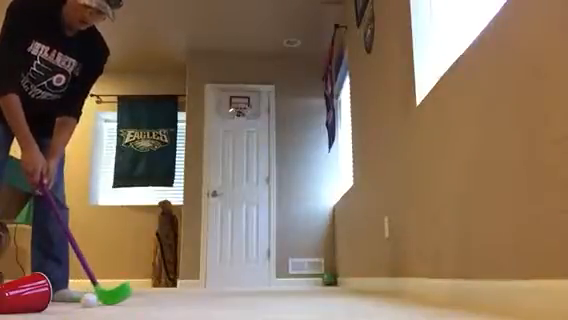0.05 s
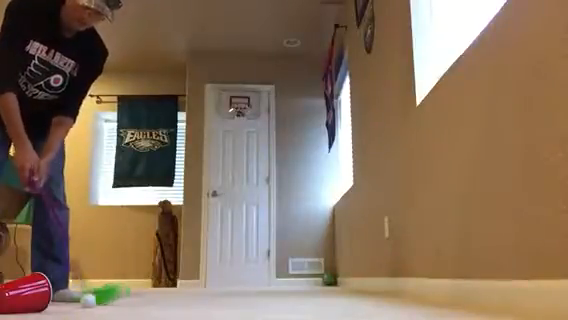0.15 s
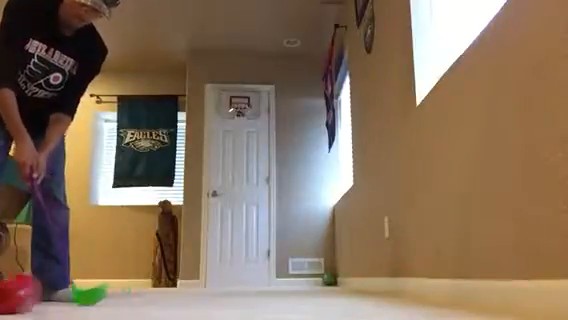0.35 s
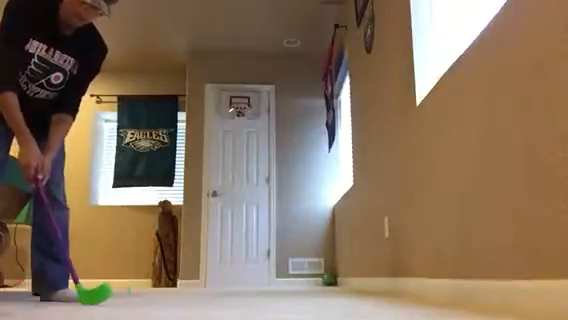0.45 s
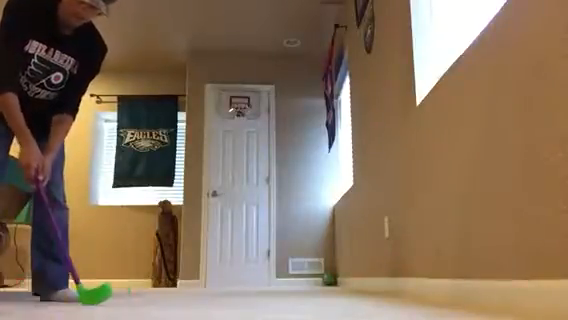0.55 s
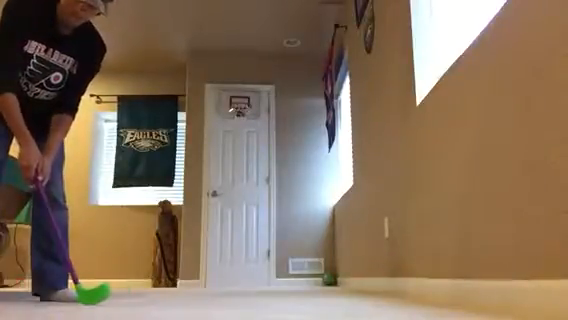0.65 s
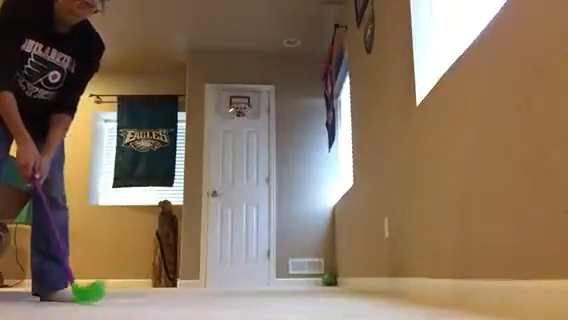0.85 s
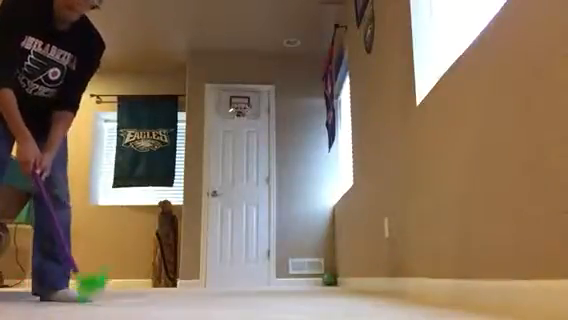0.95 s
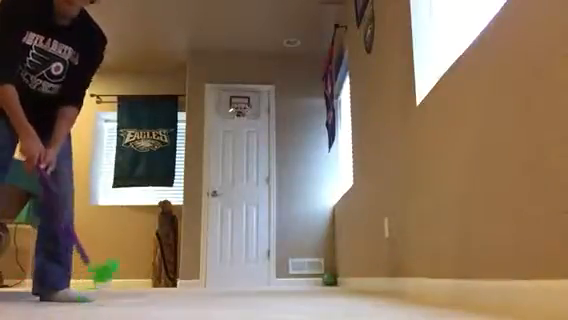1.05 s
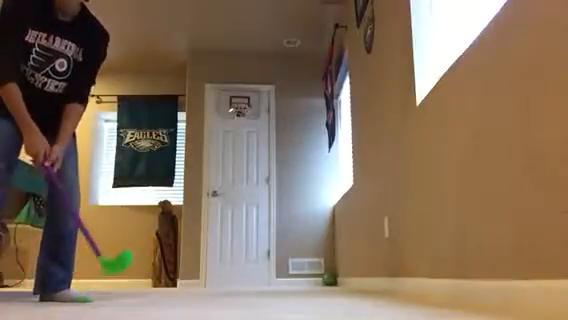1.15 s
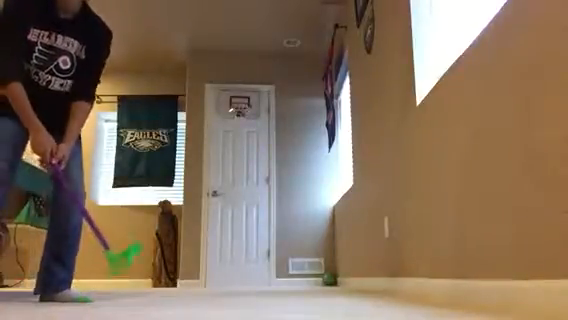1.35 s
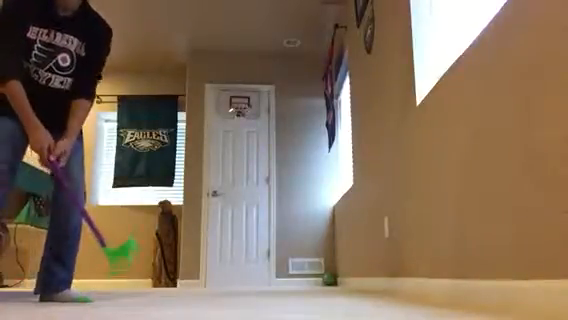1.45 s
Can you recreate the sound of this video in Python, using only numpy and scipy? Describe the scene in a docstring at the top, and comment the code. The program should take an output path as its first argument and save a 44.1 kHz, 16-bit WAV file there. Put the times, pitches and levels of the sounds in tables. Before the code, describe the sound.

A hollow plastic ball clatters in a plastic cup. A toy club taps it first, then it knocks three quick times in the cup, rolls and rattles faintly to rest. Heard nearby in a small carpeted room.

```python
"""Toy putt into a plastic cup.

A toy club taps a hollow plastic ball across a carpet into a plastic cup lying on its side.
The ball knocks three times, ringing the cup's body, wall and air, then rolls and rattles to rest.
The floor thumps softly, the lifted club clicks, and a small room answers over a low house hum."""
import sys
import numpy as np
from scipy import signal
from scipy.fft import rfft, irfft, next_fast_len
from scipy.io import wavfile

SR = 44100
rng = np.random.default_rng(int(sys.argv[2]) if len(sys.argv) > 2 else 0)


def generate_wav(sig):
    """Save sig (samples, or channels by samples) to the path in sys.argv[1] as 16-bit PCM at SR."""
    pcm = np.round(np.clip(np.atleast_2d(sig).T, -1, 1) * 32767).astype(np.int16)
    wavfile.write(sys.argv[1], SR, pcm)


N = 66150

# ball-cup contacts [t/s, air level/dB, body level/dB, wall level/dB, click level/dB]
CONTACTS = [(.3360, -15, -9.5, -18.5, -25), (.3440, -54, -20.5, -18, -27), (.3475, -59, -26.5, -8, -45),
            (.3610, -35, -46, -24, -65), (.4213, -19.5, -11.5, -29.5, -24.5),
            (.4325, -23.5, -25.5, -22.5, -58), (.4870, -19.5, -13.5, -56, -30),
            (.4980, -30, -51, -24, -66.5), (.7100, -68, -69, -64, -50), (0.748, -50, -74, -79, -49),
            (0.8021, -66, -34.5, -47.5, -50.5), (.8650, -52, -37, -41.5, -48), (0.8903, -53, -46, -39, -61),
            (0.92, -68, -37.5, -37, -54), (0.9294, -47.5, -29.5, -35, -43), (.9415, -36.5, -41.5, -32, -82)]
# cup modes: whole body, then thin wall [f/Hz, level/dB, t60/s]
CUP_MODES = [(548.4, -5.5, 0.065), (716.7, 3, 0.035), (896, -21, 0.14), (1016, -7, 0.048),
             (1193.4, -0.5, .065), (1257.8, -1, .065), (1449, -21, .08), (1568, -16, .11),
             (1951, -24, 0.068), (2043, -25.5, 0.1103), (2099, -19, .11), (2420, -24, 0.036),
             (2814, -28.5, 0.13), (3322, -25.5, 0.14), (4130, -30.5, 0.1213)]
# air mode of the cup [f/Hz, level/dB, t60/s]
CUP_AIR_MODE = [(533, 0, .195)]
# contact click spectrum [f/Hz, level/dB]
CLICK_SPECTRUM = [(500, 11), (2000, 3), (4000, -3), (4800, -3.5), (6000, 6), (7700, -5), (8900, 2),
                  (10300, -20), (12000, -4.5), (15500, -14)]
# plastic shell spectrum [f/Hz, level/dB]
SHELL_SPECTRUM = [(400, -6), (1000, 1.5), (1500, 11.5), (1700, 4.5), (2150, 11.5), (2530, -5), (2900, 3),
                  (3300, -1.5), (3600, -4.5), (4050, 0.5), (4700, -11.5), (5600, 0), (6700, -5.5),
                  (7700, -13.5), (8900, -17), (10300, -29.5), (12000, -13.5), (15500, -36.5)]
# carpeted floor thud spectrum [f/Hz, level/dB]
THUD_SPECTRUM = [(30, -34.5), (70, -11.5), (120, -3), (250, -1.5), (450, -4), (700, -14.5), (1500, -16),
                 (5000, -63.5)]
# envelope of the rolling ball [t/s, level/dB]
ROLL_ENVELOPE = [(.55, -45.5), (.62, -57), (.69, -59), (.74, -60), (0.809, -48.5), (.85, -52), (.93, -51),
                 (0.964, -48.5), (0.986, -83), (1.1, -100)]
# floor rumble under the ball [f/Hz, level/dB]
RUMBLE_SPECTRUM = [(60, -8), (130, -1.5), (230, -7.5), (340, 1.5), (470, 1.5), (600, -5), (1000, -10),
                   (1500, -39), (5000, -57)]
# modes of club head and ball [f/Hz, level/dB, t60/s]
PUTT_MODES = [(248, -24, 0.018), (389, 6.5, 0.016), (607, -5.5, 0.12), (903, -7.5, 0.043),
              (1472, -28.5, 0.21), (2285, -31, 0.17)]
# club face spectrum [f/Hz, level/dB]
FACE_SPECTRUM = [(600, -6), (1500, 0.5), (2100, -1), (2800, -4.5), (4000, 2.5), (4700, -2), (5500, 1.5),
                 (7500, 2), (8300, -6.5), (10300, -4.5), (13000, -7.5), (15500, -14)]
# hollow shaft spectrum [f/Hz, level/dB]
SHAFT_SPECTRUM = [(120, -38.5), (300, 12.5), (420, 0), (560, 4.5), (900, -2.5), (1700, -4), (2500, 8.5),
                  (4000, -4), (5200, 1.5), (8000, -6.5), (10300, -11.5), (12000, -12.5), (15500, -32.5)]
# clicks of the lifted club [t/s, level/dB]
LIFT_CLICKS = [(1.358, -50), (1.376, -55)]
# floor thumps [t/s, level/dB, rise/s]
THUMPS = [(0.175, -47.5, 0.02), (0.45, -44.5, 0.033), (0.67, -47.5, 0.047), (.79, -47, 0.017),
          (0.968, -61.5, 0.11), (1.21, -55.5, 0.033), (1.376, -56.5, 0.024)]
# near wall echoes [delay/s, level/dB]
WALL_ECHOES = [(0.0092, -17), (0.0259, -15)]
# room decay [f/Hz, t60/s]
ROOM_DECAY = [(100, .5), (500, .38), (1500, .4), (3000, .4), (6000, .42), (9000, .34), (15000, .27)]
# response of the carpeted room [f/Hz, level/dB]
ROOM_COLOUR = [(100, -2.5), (300, 0), (1000, 1), (3000, 4), (6000, 0), (9000, -3.5), (15000, -4.5)]
# house hum spectrum [f/Hz, level/dB]
HUM_SPECTRUM = [(20, -38), (45, -7.5), (75, 2.5), (110, -7.5), (220, -12), (350, -14.5), (550, -21.5),
                (1800, -23), (6000, -25), (16000, -40)]

BODY_ATTACK_S, WALL_ATTACK_S, MODE_SCATTER_DB = .003, .002, 2.5


def cup_knocks(wall_from_hz=950, shell_db=-4, thud_db=-25.5):
    """Each contact clicks, rings the cup and its air, and presses it on the floor: (ring, noise)."""
    body_modes = [mode for mode in CUP_MODES if mode[0] < wall_from_hz]
    wall_modes = [mode for mode in CUP_MODES if mode[0] >= wall_from_hz]
    out = np.zeros((2, N))
    for at_s, air_db, body_db, wall_db, click_db in CONTACTS:
        air = amp(air_db) * ring(CUP_AIR_MODE, BODY_ATTACK_S)
        body = amp(body_db) * ring(body_modes, BODY_ATTACK_S)
        wall = amp(wall_db) * ring(wall_modes, WALL_ATTACK_S)
        click = burst(CLICK_SPECTRUM, t60_s=.011) + amp(shell_db) * burst(SHELL_SPECTRUM, t60_s=.075)
        thud = amp(body_db + thud_db) * burst(THUD_SPECTRUM, t60_s=.14)
        out[0] += delayed(air + body + wall, at_s)
        out[1] += delayed(amp(click_db) * click + thud, at_s)
    return out


def ball_roll(ticks_per_s=300, max_t60_s=.06, grit_db=-8):
    """The ball's uneven skin ticks along the cup wall and rumbles the floor: (ring + rumble, grit)."""
    ticks = (rng.random(N) < ticks_per_s / SR) * np.tanh(rng.standard_normal(N))
    envelope = amp(np.interp(clock(), *np.transpose(ROLL_ENVELOPE), left=-120, right=-120))
    damped_modes = [(hz, db, min(t60_s, max_t60_s)) for hz, db, t60_s in CUP_MODES[1:]]
    cup = unit(signal.fftconvolve(ticks, ring(damped_modes, WALL_ATTACK_S))[:N])
    grit = unit(signal.fftconvolve(ticks, burst(SHELL_SPECTRUM, t60_s=.013))[:N])
    return np.array([envelope * cup + floor_rumble(), envelope * amp(grit_db) * grit])


def floor_rumble(from_s=.597, to_s=1, fade_s=.093, level_db=-56):
    """The floor carries the rolling ball as low noise."""
    t = clock()
    envelope = np.clip(np.minimum(t - from_s, to_s - t) / fade_s, 0, 1)
    return amp(level_db) * envelope * noise(RUMBLE_SPECTRUM)


def putt(at_s=.2352, level_db=-11, echo_s=.0103, brush_db=-34, brush_rise_s=.0041):
    """The club brushes the carpet and pops the ball; the click echoes off a wall: (ring, noise)."""
    face = burst(FACE_SPECTRUM, t60_s=.005)
    shell = amp(-19) * burst(FACE_SPECTRUM, t60_s=.06)
    click = amp(-12) * (face + shell)
    echo = amp(-6) * delayed(click, echo_s)
    thud = amp(-13) * burst(THUD_SPECTRUM, t60_s=.16)
    hit = amp(level_db) * (click + echo + thud)
    brush = amp(brush_db) * noise(THUD_SPECTRUM) * np.exp(-abs(clock() - at_s) / brush_rise_s)
    pop = amp(level_db) * ring(PUTT_MODES, attack_s=.0015)
    return np.array([delayed(pop, at_s), delayed(hit, at_s) + brush])


def club_lift(scuff_s=1.34, scuff_db=-64, half_width_s=.025):
    """The hollow club scuffs and clicks softly as it comes off the carpet."""
    out = amp(scuff_db) * noise(SHAFT_SPECTRUM) * np.exp(-((clock() - scuff_s) / half_width_s) ** 2)
    for at_s, db in LIFT_CLICKS:
        click = burst(SHAFT_SPECTRUM, t60_s=.02) + amp(-6) * burst(SHAFT_SPECTRUM, t60_s=.18)
        out += delayed(amp(db) * click, at_s)
    return out


def floor_thumps(floor_hz=70.6):
    """The floor booms softly under shifting weight."""
    t = clock()
    out = np.zeros(N)
    for at_s, db, rise_s in THUMPS:
        envelope = (t / rise_s) ** 2 * np.exp(2 * (1 - t / rise_s))
        out += delayed(amp(db) * envelope * np.sin(2 * np.pi * floor_hz * t), at_s)
    return out


def room_tail(x, build_s=.01):
    """Diffuse reverberation of x; each frequency dies at its own rate."""
    hz, t, spectra = signal.stft(rng.standard_normal(N), SR, nperseg=256)
    spectra = spectra * decay(t, along(ROOM_DECAY, hz)[:, None])
    impulse = signal.istft(spectra, SR, nperseg=256)[1][:N]
    impulse *= 1 - np.exp(-(clock() / build_s) ** 2)
    tail = signal.fftconvolve(x, impulse / np.linalg.norm(impulse))[:N]
    return filtered(tail, lambda hz: amp(along(ROOM_COLOUR, hz)))


def house_hum(level_db=-67.5):
    """Steady low noise of the house."""
    return amp(level_db) * noise(HUM_SPECTRUM)


def ring(modes, attack_s):
    """Damped modes; their levels scatter from strike to strike."""
    t = clock()[:SR // 2]
    tones = np.zeros(len(t))
    for hz, db, t60_s in modes:
        gain = amp(db + MODE_SCATTER_DB * rng.standard_normal())
        tones += gain * np.sin(2 * np.pi * hz * t) * decay(t, t60_s)
    attack = 1 - np.exp(-(t / attack_s) ** 2)
    return np.pad(tones * attack, (0, N - len(t)))


def burst(spectrum, t60_s, size=16384):
    """Coloured noise: instant onset, exponential decay."""
    gains = amp(along(spectrum, np.fft.rfftfreq(size, 1 / SR)))
    coloured = unit(irfft(rfft(rng.standard_normal(size)) * gains))
    return np.pad(coloured * decay(np.arange(size) / SR, t60_s), (0, N - size))


def noise(spectrum):
    """Coloured noise, rms 1."""
    return unit(filtered(rng.standard_normal(N), lambda hz: amp(along(spectrum, hz))))


def filtered(x, response):
    """Zero-phase filter with gain response(hz)."""
    size = next_fast_len(N + SR // 2)
    return irfft(rfft(x, size) * response(np.fft.rfftfreq(size, 1 / SR)), size)[:N]


def along(points, hz):
    """Interpolate (f/Hz, value) points on a log frequency axis."""
    point_hz, values = np.transpose(points)
    return np.interp(np.log(hz + 1), np.log(point_hz + 1), values)


def delayed(x, delay_s):
    return np.pad(x, (max(0, round(delay_s * SR)), 0))[:N]


def decay(t, t60_s):
    return np.exp(-np.log(1000) * t / t60_s)


def amp(db):
    return 10 ** (np.asarray(db) / 20)


def unit(x):
    return x / np.sqrt(np.mean(x ** 2) + 1e-20)


def clock():
    return np.arange(N) / SR


def scene(click_send_db=-5, ring_send_db=-16):
    """Direct sound, wall echoes, room tail, thumps and hum; mono."""
    rings, clicks = putt() + cup_knocks() + ball_roll()
    clicks = clicks + club_lift()
    echoes = sum(amp(db) * delayed(clicks, delay_s) for delay_s, db in WALL_ECHOES)
    tail = room_tail(amp(click_send_db) * clicks + amp(ring_send_db) * rings)
    return (rings + clicks + echoes + tail + floor_thumps() + house_hum())[None]


def record(dry):
    """Steep low-pass."""
    cutoff_hz = 15900
    return filtered(dry[0], lambda hz: 1 / np.sqrt(1 + (hz / cutoff_hz) ** 120))[None]


dry = scene()
out = record(dry)
generate_wav(out)
```